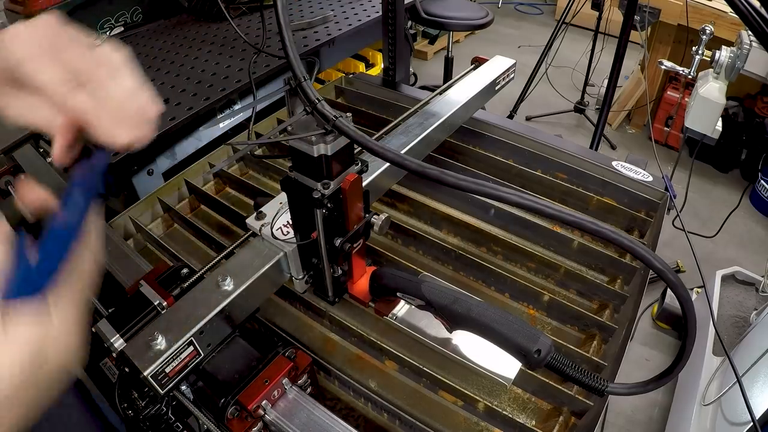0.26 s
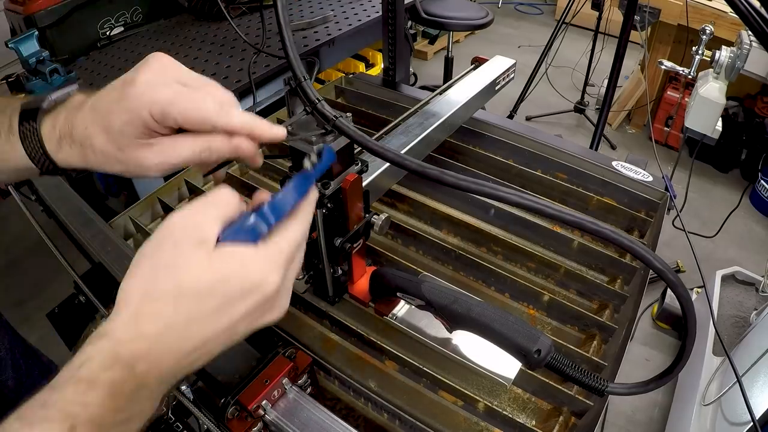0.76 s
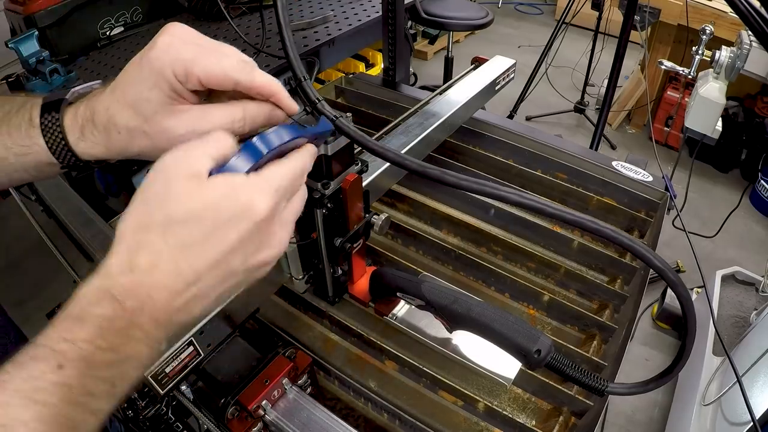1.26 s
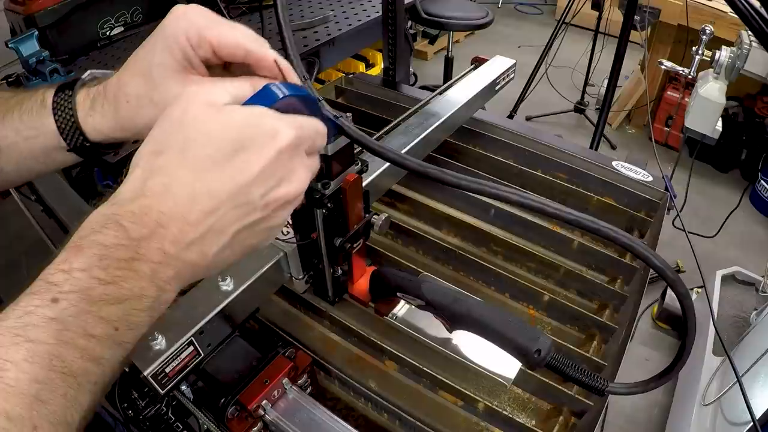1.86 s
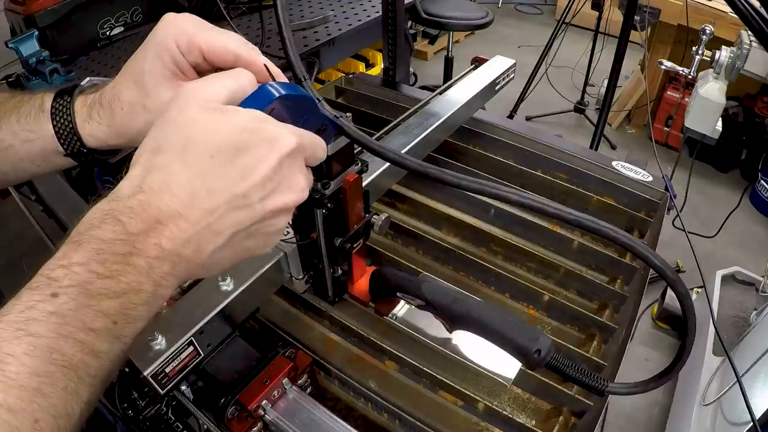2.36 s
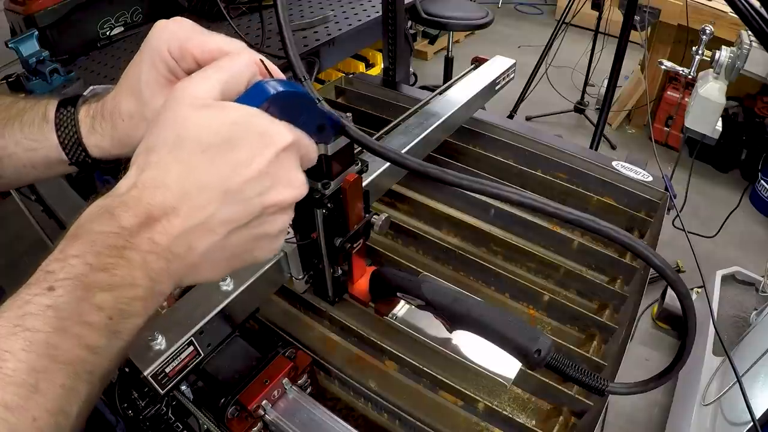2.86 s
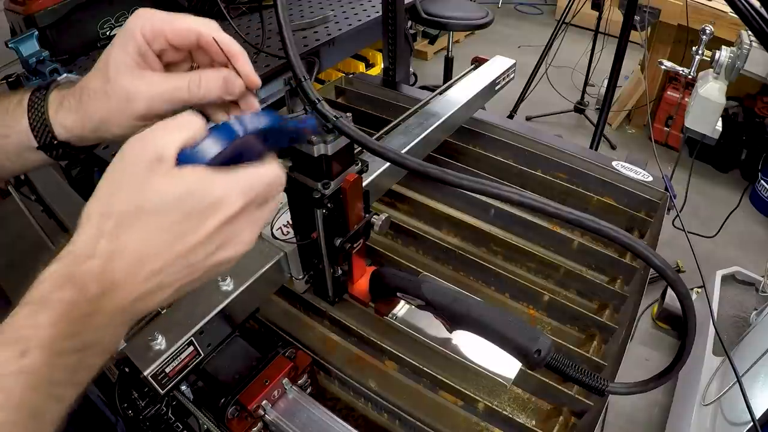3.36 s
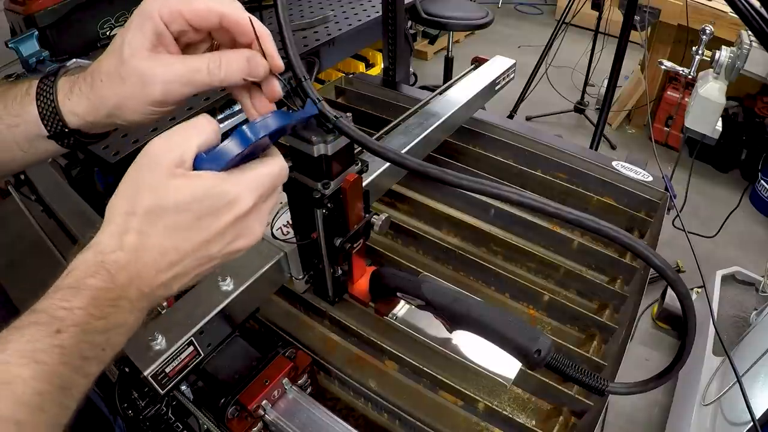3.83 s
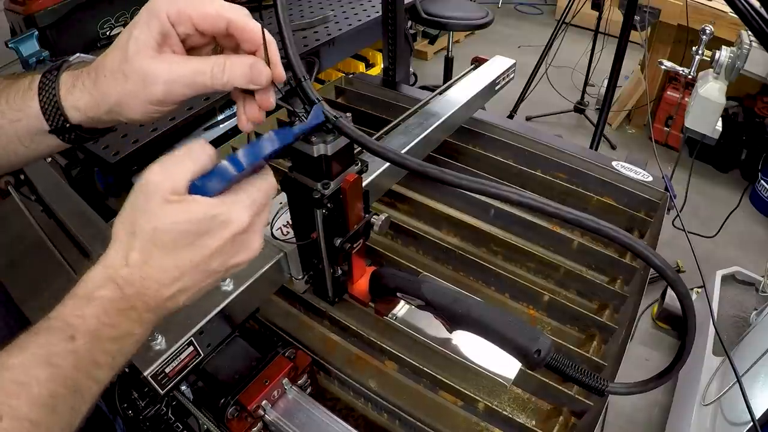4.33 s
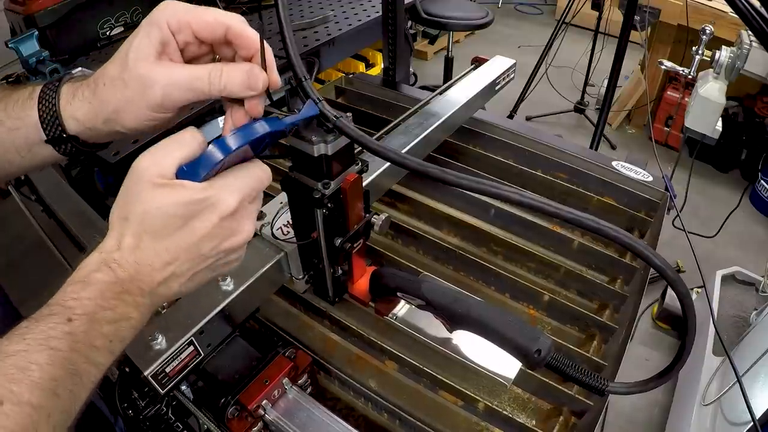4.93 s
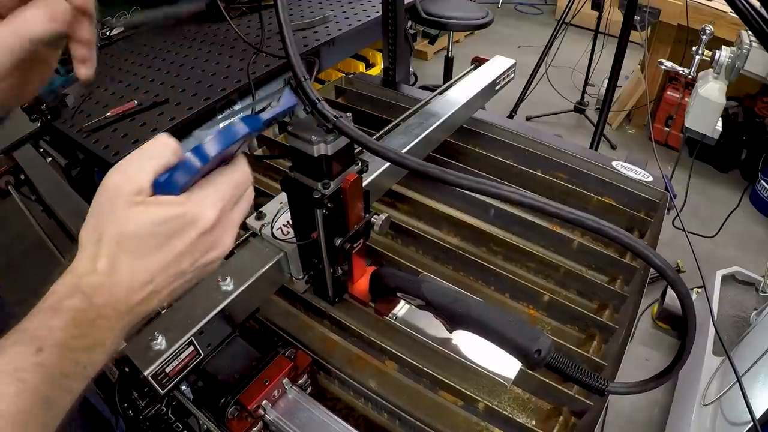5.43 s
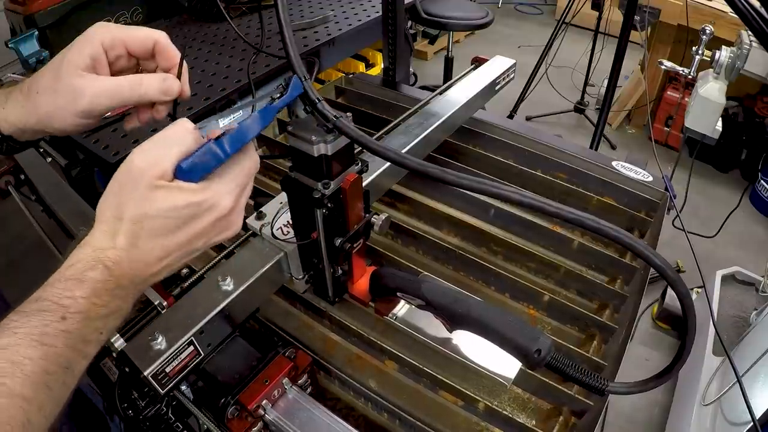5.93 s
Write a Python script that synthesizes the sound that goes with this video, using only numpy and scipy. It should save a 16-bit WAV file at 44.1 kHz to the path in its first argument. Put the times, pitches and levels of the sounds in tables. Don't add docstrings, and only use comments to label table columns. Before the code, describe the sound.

Close up, a hand-held tie gun is handled with faint sleeve rustle and small latch clicks, then ratchets sparsely until a loud, hollow snap cuts the tie. Lighter pops follow, a second burst of quick ratchet clicks, another loud snap and a bright clattering trigger return. Each hard snap echoes in a large, hard workshop over low building hum.

```python
import sys
import numpy as np
from scipy import signal
from scipy.io import wavfile
from scipy.ndimage import uniform_filter1d

SR = 44100
rng = np.random.default_rng(int(sys.argv[2]) if len(sys.argv) > 2 else 0)


def convert_level_to_amplitude(level_db):
    exponent = np.asarray(level_db, float) / 20
    return 10 ** exponent


def master(y):
    cut = np.clip(np.atleast_2d(y).T, -1, 1)
    pcm = np.round(cut * 32767)
    wavfile.write(sys.argv[1], SR, pcm.astype(np.int16))


N = 272979

# (frequency [Hz], density [dB per Hz])
HUM_COLOUR = [(15, -62), (25, -37.5), (53, -28.5), (123, -0.5), (170, -8), (591, -14.5), (714, -18.5),
              (1290, -20.5), (2410, -29), (3250, -28), (3820, -30.5), (6740, -35), (16000, -36.5)]
# (peak time [s], level [dB], rise [s], fall [s])
RUMBLE_SWELLS = [
    (1.15, -49, 0.38, 0.12),
    (1.4, -44.5, 0.17, 0.37),
    (2.0, -53, 0.16, 0.33),
    (2.9, -32.5, 0.046, 0.19),
    (4.0, -53, 0.61, 0.75),
    (4.6, -62, 0.38, .3),
    (5.15, -35.5, 0.035, 0.17),
    (5.7, -54.5, 0.26, 0.29),
]
# (frequency [Hz], density [dB per Hz])
RUMBLE_COLOUR = [(40, -37), (75, -14.5), (130, 5.5), (250, -6.5), (420, -3), (650, -11.5), (1500, -36.5)]
# (peak time [s], level [dB], rise [s], fall [s])
RUSTLE_STROKES = [
    (.03, -47.5, 0.13, 0.073),
    (.2, -49.5, 0.032, 0.093),
    (.56, -52.5, 0.096, 0.29),
    (1.0, -66, 0.4, 0.29),
    (1.4, -66, 0.27, 0.14),
    (1.7, -59, 0.21, 0.18),
]
# (frequency [Hz], density [dB per Hz])
CLOTH_COLOUR = [(290, -19), (500, -4.5), (1460, -12), (1820, -8), (2500, -13.5), (5710, -11.5),
                (14000, -17.5), (16000, -23)]
# (start [s], end [s], pitch [Hz], bandwidth [Hz], level [dB])
SQUEAKS = [
    (0.545, 0.585, 2980, 121, -56),
    (0.704, 0.855, 3000, 90, -70),
    (0.814, 0.957, 1723, 45, -59.5),
    (1.087, 1.207, 1710, 121, -60.5),
    (3.603, 3.88, 1280, 304, -59.5),
]

# (frequency [Hz], t60 [s])
HALL_T60 = [(100, 0.28), (300, 1), (900, 0.87), (2200, 0.69), (5000, 0.78), (8300, 0.8), (12000, 0.36),
            (16000, 0.3)]
# (frequency [Hz], level [dB])
HALL_TONE = [(100, -6.5), (500, -17.5), (900, -7.5), (1250, -9), (2500, -4.5), (5000, -1), (7200, -1),
             (10000, 0), (16000, 0.5)]
# (delay [s], level [dB])
ECHOES = [
    (.0075, -11),
    (0.01, -23.5),
    (0.0247, -13),
    (.033, -17),
]
# (frequency [Hz], level [dB])
POP_AIR = [(1500, -7.5), (6000, -3.5), (9000, -5), (12000, 2), (15500, 8.5)]
# (frequency [Hz], level [dB])
HAND_SHADE = [(550, -1.5), (820, -4.5), (1050, 4.5), (6900, -2), (7700, -9), (8400, -10.5), (9600, -7),
              (11200, 3)]

MACHINE_HZ = {"bed": 145, "plate": 280, "frame": 375, "rail": 490, "post": 602, "cover": 560, "lid": 770}
GUN_HZ = {"grip": 1280, "barrel": 1870, "shell": 2170, "cheek": 2290, "lever": 3400, "nose": 2650, "spring":
          6680, "jaw": 2120, "knuckle": 2960, "sear": 7250, "blade": 10250, "pin": 12800, "pawl": 14050,
          "tooth": 15200}
RING_T60 = {"lid": 0.019, "bed": 0.94, "plate": 0.027, "frame": 0.2, "rail": 0.12, "post": 2, "cover":
            0.015, "grip": 0.012, "barrel": 0.033, "shell": 0.082, "cheek": 0.025, "lever": 0.046, "nose":
            .025, "spring": 0.039, "blade": 0.058, "pin": 0.028, "pawl": 0.054, "tooth": 0.033, "sear": .03,
            "knuckle": .05, "jaw": 0.021}
RING_HALL_DB = {"lid": -14, "bed": -10, "plate": -9, "frame": -11, "rail": -13, "post": -8, "cover": -15,
                "grip": -9, "barrel": -9, "shell": -13.5, "cheek": -8, "lever": -14, "nose": -9, "spring":
                -26, "blade": -13, "pin": -26, "pawl": -23, "tooth": -26, "sear": -15.5, "knuckle": -20,
                "jaw": -9}
# (time [s], part struck, level [dB])
MACHINE_RINGS = [(1.062, "frame", -47), (1.355, "frame", -36), (1.356, "cover", -35), (1.493, "rail", -39),
                 (1.5, "bed", -53), (1.548, "rail", -46), (1.598, "frame", -47), (2.8342, "cover", -7),
                 (2.836, "lid", -17), (2.837, "bed", -36), (2.842, "frame", -25), (3.0697, "lid", -16),
                 (4.044, "frame", -37.5), (4.592, "cover", -40), (5.072, "rail", -28), (5.072, "lid", -11),
                 (5.073, "plate", -28), (5.074, "cover", -14), (5.075, "bed", -36), (5.285, "post", -51)]
# (time [s], part struck, level [dB])
GUN_RINGS = [(.692, "knuckle", -38), (1.355, "barrel", -35), (1.363, "lever", -42.5),
             (1.493, "barrel", -37), (1.8254, "spring", -32), (1.84, "lever", -38), (1.843, "jaw", -28),
             (1.9785, "grip", -29), (2.2876, "sear", -44), (2.3915, "barrel", -38), (2.837, "nose", -13),
             (2.8377, "barrel", -7), (2.841, "grip", -13), (3.036, "lever", -25), (3.068, "jaw", -16),
             (3.069, "blade", -30), (3.084, "pawl", -30), (3.608, "spring", -63), (3.798, "spring", -59),
             (4.047, "blade", -40), (4.066, "spring", -39.5), (4.079, "tooth", -30), (4.097, "tooth", -26),
             (4.097, "pin", -22), (4.167, "pawl", -43), (4.253, "lever", -30), (4.253, "grip", -31),
             (4.254, "barrel", -23), (4.281, "pawl", -34), (4.293, "pawl", -32), (4.301, "pawl", -25),
             (4.325, "shell", -19), (4.326, "sear", -29), (4.326, "blade", -31), (4.335, "cheek", -25),
             (4.744, "spring", -36), (5.073, "barrel", -12), (5.073, "grip", -13), (5.251, "pin", -21),
             (5.262, "blade", -19.5), (5.263, "pin", -22), (5.264, "blade", -21), (5.265, "tooth", -10.5),
             (5.268, "pawl", -24), (5.2836, "shell", -13), (5.289, "cheek", -12), (5.296, "blade", -29),
             (5.3, "pawl", -32), (5.319, "cheek", -25), (5.348, "shell", -29), (5.745, "spring", -58.5),
             (5.866, "grip", -45), (5.866, "pawl", -48), (5.867, "spring", -41), (6.058, "spring", -45),
             (6.073, "spring", -27), (6.085, "barrel", -26.5), (6.123, "tooth", -29), (6.123, "grip", -40)]
# (time [s], peak level [dB], pitch [Hz], length [ms])
KNOCKS = [(1.056, -47, 250, 5), (1.355, -33, 303, 1.6), (1.976, -45, 200, 3.7), (2.392, -44, 200, 8.8),
          (2.834, -9, 172, 6.9), (2.841, -14, 100, 6.5), (3.0697, -10, 210, 1.13), (4.042, -30.5, 300, 3.2),
          (4.098, -64, 200, 5.5), (4.325, -28, 250, 5.9), (4.805, -22, 200, 1.9), (4.828, -31, 220, 4.8),
          (5.073, -18.5, 130.4, 11), (5.076, -10.5, 80, 11), (5.264, -15, 142, 9.5), (5.288, -21, 251, 2.4),
          (6.1231, -17, 200, 2.1)]

# (frequency [Hz], level [dB])
BODY_COLOUR = [(400, -38.5), (800, -18.5), (1100, -1.5), (1500, -10.5), (2000, -0.5), (2800, 2),
               (3200, -0.5), (5000, -56.5)]
# (frequency [Hz], level [dB])
CRACK_COLOUR = [(1800, -15.5), (2700, -10), (3400, -1.5), (5000, -5), (6700, -8), (8200, -9), (9300, -7.5),
                (12000, -31.5)]
# (frequency [Hz], level [dB])
BRIGHT_COLOUR = [(6000, -34), (8500, -11), (10000, 2), (12500, 4), (14500, 4), (15700, -0.5)]
# (frequency [Hz], bandwidth [Hz], level [dB])
GUN_MODES = [
    (3960, 650, -23),
    (6800, 1000, -3.5),
    (10850, 110, -24.5),
    (13300, 290, -13),
    (14400, 270, -16.5),
]
# (time [s], strength [dB], brightness [dB], body pitch [Hz])
FUMBLES = [(.087, -49.5, -8, 3180), (0.84, -58, -12, 1120), (0.855, -48.5, -3, 2820),
           (0.9765, -55.5, -18, 3700), (1.01, -58, -12, 1740), (1.178, -50, -7, 1770),
           (1.223, -58.5, -23, 2030), (1.548, -55, -21, 1850), (1.578, -50, -14, 1870),
           (1.5982, -46, -21, 1890), (1.805, -50, -6, 1870), (2.4642, -46.5, -8, 2140),
           (2.5969, -53, -2, 2150), (3.497, -48.5, -8, 2340), (3.546, -55, -7, 1920),
           (3.609, -54.5, -19, 1120), (3.618, -53, -5, 1570), (3.6902, -48, -9, 3260),
           (3.729, -54, -11, 1230), (3.798, -54.5, -17, 1210), (3.848, -59, -21, 1335),
           (3.9456, -55.5, -10, 1164), (3.999, -54.5, -19, 1900), (4.508, -54.5, -27, 1960),
           (4.592, -52, -9, 2600), (4.729, -52, 5, 1713), (5.045, -47, -6, 2220), (5.662, -61, 6, 1720),
           (5.743, -56.5, -10.5, 1270), (5.764, -55, -10, 2740)]
# (time [s], strength [dB], brightness [dB], body pitch [Hz])
TICKS = [(1.527, -58, -23, 1980), (2.284, -53, -20, 2030), (2.456, -60, -17, 1960), (2.627, -66, -12, 2500),
         (2.72, -55, -6, 2010), (2.797, -57, 0, 2500), (2.9149, -31, -18, 2850), (3.293, -66, 20, 2500),
         (3.736, -59, -7, 2600), (3.829, -58, -6, 2400), (4.487, -51.5, -14, 1900), (4.716, -57, -12, 2050),
         (5.61, -63, 12.5, 2200), (5.734, -59, -4.5, 3490)]
# (time [s], strength [dB], brightness [dB], rattle length [ms])
LATCH = [
    (.2663, -28, 0.5, 3),
    (.272, -36.5, -2, 1.1),
    (.543, -45, 0, 2.3),
    (.558, -42, -5, 1.2),
    (.6916, -37.5, 7, 3.8),
    (.698, -37.5, -3, 8),
]
# (time [s], strength [dB], brightness [dB], rattle length [ms])
FEEDING = [(.6705, -43, 6, 1.2), (1.0558, -35.5, -5, 9), (1.062, -44.5, -11, 1.9), (1.0649, -41.5, -2, 3.4),
           (1.3533, -28.5, -4.5, 8.4), (1.3633, -34, 1, 6.4), (1.4898, -36.5, -11, 9.3),
           (1.497, -47, -13, 2.9), (1.8253, -34, 9, 7.4), (1.8411, -31.5, 4, 2.4),
           (2.2876, -38.5, -1.5, 3.7), (2.3253, -47.5, -2.5, 2.7), (2.7289, -41.5, -11.5, 8.1),
           (2.7817, -44, -7.5, 4.6), (3.0165, -28, -5.5, 8.6), (3.0238, -19, -9, 2.5),
           (3.0275, -22, 15.5, 11), (3.0667, -16.5, 6, 5.4), (3.0702, -19, 6, 3)]
# (time [s], strength [dB], brightness [dB], rattle length [ms])
PUMPING = [(4.0325, -35, -2, 3.8), (4.042, -25, 3.5, 3.5), (4.046, -32, 5, 1.8), (4.053, -38, -7, 9.6),
           (4.065, -35, -3, 4.7), (4.0795, -28.5, 15.5, 5.3), (4.0851, -25, -4, 15), (4.1665, -33, 0, 9.3),
           (4.253, -29, -2, 0.99), (4.255, -25.5, 3, 4.1), (4.28, -23, 9, 6.2), (4.2918, -30.5, -1, 8.7),
           (4.303, -27, 4, 11), (4.3245, -18.5, 6.5, 4.2), (4.3346, -23, 12, 5), (4.5546, -46.5, 21.5, 2.1),
           (4.7358, -41.5, 0, 8.2), (4.747, -45.5, -4, 5.6), (4.764, -31, -1, 6.7), (4.7787, -27, -11, 3.8)]
# (time [s], strength [dB], brightness [dB], rattle length [ms])
NEXT_TIE = [
    (5.8634, -45, 7, 3.8),
    (5.869, -42.5, -1, 4.2),
    (6.058, -43, 11, 2.2),
    (6.0661, -32, 7, 4.7),
    (6.0719, -27, 8, 13),
    (6.085, -22, 2, 3),
    (6.09, -31, 3, 2.5),
]
# (time [s], strength [dB], brightness [dB], rattle length [ms])
LINKAGE = [(1.815, -49, 14, 3.2), (2.7335, -40.5, -10, 5.6), (2.7421, -48.5, 0, 5.1),
           (2.7465, -43.5, -14, 4.9), (2.8248, -26, -1, 7.7), (3.0305, -26.5, -22, 1.2),
           (3.0355, -23, -13, 4.4), (4.0735, -32, -3, 4.9), (4.0959, -22, 4, 8.9),
           (4.1595, -38.5, -11, 3.4), (4.603, -53, -13, 4), (4.7554, -37.5, 0, 4.1), (4.7608, -27, 13, 4),
           (5.5549, -43.5, 6, 2.8)]
# (time [s], strength [dB], brightness [dB], rattle length
# [ms])
LATE_POPS = [
    (3.4419, -29, 7.5, 3.6),
    (3.4685, -34, 9, 5.6),
]
# (time [s], strength [dB], brightness [dB], rattle length [ms])
POPS = [(1.9785, -29, 2.6, 4.7), (1.985, -47, 29, 6), (2.3912, -30, 8.3, 4.1), (2.398, -45, 16, 9.6),
        (3.0695, -23.5, 11, 3), (4.804, -31.5, 24, 3.5), (4.8105, -39.5, 32, 6), (4.8287, -31.5, 12, 3.7),
        (4.835, -43, 29, 7.6), (6.123, -25, 10, 3), (6.129, -47, 34, 6.6)]
# (time [s], strength [dB], brightness [dB], rattle length [ms])
RELEASE = [
    (5.2335, -31.5, -8.5, 2.5),
    (5.2483, -20.5, -2, 2.1),
    (5.2508, -15.5, 7, 5.8),
    (5.2628, -18.5, 1, 3),
    (5.2655, -18.5, 14.5, 5.2),
    (5.2833, -18.5, -3.5, 4.1),
    (5.288, -14.5, 6, 4.9),
    (5.2955, -40, 6, 2.8),
]
# (time [s], strength [dB], brightness [dB], rattle length [ms], body pitch [Hz])
SNAPS = [
    (2.8346, -6.5, -1, 11.3, 1880),
    (2.8375, -12, -12.5, 3.9, 2700),
    (2.8445, -13.5, 3.5, 5.8, 2260),
    (5.0715, -7.5, -0.5, 12, 1967),
    (5.0745, -9, 1, 2.9, 1420),
    (5.0815, -19.5, 14, 5.8, 1820),
    (5.0965, -20.5, 1, 3.5, 2900),
]


def evened(x):
    return x / np.sqrt(np.mean(x ** 2) + 1e-20)


def read(points, hz):
    f, value = np.transpose(points)
    return np.interp(np.log(hz + 1), np.log(f + 1), value)


def add(mix, s, sound):
    part = mix[round(s * SR):][:len(sound)]
    part += sound[:len(part)]


def causal(points):
    log_gain = np.log(convert_level_to_amplitude(read(points, abs(np.fft.fftfreq(1024, 1 / SR)))))
    spectrum = np.exp(np.conj(signal.hilbert(log_gain)))
    h = np.fft.ifft(spectrum).real[:512]
    return h / np.linalg.norm(h)


def ring(t, hz, width_hz):
    h = np.exp(-np.pi * width_hz * t) * np.sin(2 * np.pi * hz * t)
    return h / np.linalg.norm(h)


def noise(points, level_db, patchy_db, size=512):
    frames = 4 * N // size + 5
    hz = np.fft.rfftfreq(size, 1 / SR)
    real, imag, patches = rng.standard_normal((frames, len(hz), 3)).T
    patches = uniform_filter1d(patches, size=16, axis=0)
    patches = evened(uniform_filter1d(patches, size=9, axis=1))
    z = (real + 1j * imag) * convert_level_to_amplitude(read(points, hz)[:, None] + patchy_db * patches)
    sound = signal.istft(z, nperseg=size, noverlap=3 * size // 4)[1][:N]
    return convert_level_to_amplitude(level_db) * evened(sound)


def swells(rows, still_db):
    t = np.arange(N) / SR
    power = convert_level_to_amplitude(2 * still_db)
    for s, db, rise, fall in rows:
        power = power + convert_level_to_amplitude(2 * db) / np.cosh((t - s) / np.where(t < s, rise, fall) * 2) ** 2
    return 10 * np.log10(power)


def building_hum():
    t = np.arange(N) / SR
    mains = convert_level_to_amplitude(-62) * np.sin(2 * np.pi * 110 * t) + convert_level_to_amplitude(-63) * np.sin(2 * np.pi * 239 * t)
    return noise(HUM_COLOUR, -56, patchy_db=0.6, size=1024) + mains


def machine_rumble():
    level_db = swells(RUMBLE_SWELLS, still_db=-63.5) - 4.5
    return noise(RUMBLE_COLOUR, level_db, patchy_db=1.5, size=2048)


def sleeve_rustle():
    return noise(CLOTH_COLOUR, swells(RUSTLE_STROKES, still_db=-90), patchy_db=0.5)


def far_squeaks():
    out = np.zeros(N)
    for t0, t1, hz, width_hz, db in SQUEAKS:
        t = np.arange(0, t1 - t0, 1 / SR)
        resonance = ring(np.arange(2000) / SR, hz, width_hz)
        tone = signal.fftconvolve(rng.standard_normal(SR // 2), resonance)[2000:][:len(t)]
        flutter = convert_level_to_amplitude(0.57 * np.sin(60 * t + hz))
        add(out, t0, convert_level_to_amplitude(db) * tone * signal.windows.hann(len(t)) ** 0.12 * flutter)
    return out


def hall():
    t, taps = np.arange(SR) / SR, rng.standard_normal((3, SR))
    hz, frame_t, z = signal.stft(taps, SR, nperseg=256)
    loss_db = 60 * frame_t / read(HALL_T60, hz)[:, None]
    bend_db = 20.5 * frame_t ** 2
    z = z * convert_level_to_amplitude(read(HALL_TONE, hz)[:, None] - loss_db - bend_db)
    tails = signal.istft(z, SR, nperseg=256)[1][:, :SR]
    near = 0.45 * np.clip((t - 0.004) / 0.015, 0, 1)
    late = np.clip((t - 0.022) / 0.0033, 0, 1)
    tails *= near + late * (0.54 + 0.27 * np.exp(-abs(t - 0.024) / 0.008))
    early = np.zeros(SR)
    for s, db in ECHOES:
        early += convert_level_to_amplitude(db) * (t > s) * np.exp(-np.maximum(t - s, 0) / 0.00086) * taps[0]
    tails *= convert_level_to_amplitude(22 * uniform_filter1d(taps[:, ::-1], size=60) * np.exp(-t / 0.056))
    return tails / np.linalg.norm(tails[0]), early / 8


def ringing_parts():
    phase_depth_rad, size_depth = 0.37, 0.53
    out, far, t = np.zeros(N), np.zeros(N), np.arange(SR) / SR
    pitch, rows = {**MACHINE_HZ, **GUN_HZ}, MACHINE_RINGS + GUN_RINGS
    for (s, part, db), z in zip(rows, rng.standard_normal((len(rows), SR))):
        waver = evened(uniform_filter1d(z, size=120))
        swing = np.sin(2 * np.pi * pitch[part] * t + phase_depth_rad * waver)
        swing *= np.minimum(1000 * t, 1)
        sound = convert_level_to_amplitude(db - 60 * t / RING_T60[part]) * (1 + size_depth * waver[::-1]) * swing
        add(out, s, sound)
        add(far, s, convert_level_to_amplitude(RING_HALL_DB[part]) * sound)
    return out, far


def trigger_knocks():
    out, t = np.zeros(N), np.arange(4000) / SR
    for s, db, hz, ms in KNOCKS:
        turns = hz * t * (0.5 + 5.34 * np.exp(-t / 0.0016))
        add(out, s, -convert_level_to_amplitude(db) * np.sin(2 * np.pi * turns) * np.exp(-1000 * t / max(ms, 1)))
    return signal.lfilter(*signal.butter(2, 70, "high", fs=SR), out)


def blows(rows, hz):
    return [(*row, hz * (1 + 0.006 * z)) for row, z in zip(rows, rng.standard_normal(len(rows)))]


def clicks(rows, hollow_db, modes_db):
    out, far, t = np.zeros(N), np.zeros((3, N)), np.arange(1000) / SR
    colours = np.array([causal(BODY_COLOUR), causal(CRACK_COLOUR), causal(BRIGHT_COLOUR)])
    modes = np.array([convert_level_to_amplitude(db + modes_db) * ring(t[:512], hz, width_hz) for hz, width_hz, db in GUN_MODES])
    high = np.transpose(GUN_MODES)[0] > 9000
    draws = rng.standard_normal((len(rows), 4, len(t)))
    for k, (s, db, bright_db, ms, hz) in enumerate(rows):
        u = t / (max(ms, 0.5) / 1000)
        grain = convert_level_to_amplitude(13 * uniform_filter1d(draws[k, 3], size=24))
        shape = np.minimum(u / 0.044, 1) * np.exp(-1.1 * u ** 2) * grain
        paths = colours.copy()
        paths[0] += convert_level_to_amplitude(hollow_db) * ring(t[:512], hz, 300)
        struck = convert_level_to_amplitude(5.9 * draws[k, 3, :len(GUN_MODES), None]) * modes
        paths[1] += struck[~high].sum(0)
        paths[2] += struck[high].sum(0)
        layers = signal.fftconvolve(draws[k, :3] * shape, paths, axes=1)
        balance_db = np.array([-bright_db / 2, 1.08, bright_db / 2])
        gains = convert_level_to_amplitude(db + balance_db) * np.sqrt(SR / 1000)
        add(out, s - 0.0003, gains / np.linalg.norm(layers, axis=1) @ layers)
        add(far[k % 3], s, gains @ (colours + 0.42 * (paths - colours)))
    return out, far


def small_clicks():
    taps = [(s, db, bright_db, 4.6, hz) for s, db, bright_db, hz in FUMBLES + TICKS]
    taps += blows(FEEDING + PUMPING + NEXT_TIE, 2040)
    taps += blows(LINKAGE, 3600) + blows(LATCH, 2980)
    return clicks(sorted(taps), hollow_db=8, modes_db=-4)


def scene():
    background = building_hum() + machine_rumble() + sleeve_rustle() + far_squeaks()
    tails, early = hall()
    ringing, ringing_far = ringing_parts()
    low = trigger_knocks()
    small, small_far = small_clicks()
    late_pops, late_pops_far = clicks(blows(LATE_POPS, 1900), hollow_db=12, modes_db=-10)
    pops, pops_far = clicks(blows(POPS, 1900), hollow_db=9.5, modes_db=-8.5)
    back, back_far = clicks(blows(RELEASE, 2040), hollow_db=0, modes_db=-10)
    snaps, snaps_far = clicks(SNAPS, hollow_db=9, modes_db=-8)

    shade = causal(HAND_SHADE)
    back = signal.fftconvolve(back, shade)[:N]
    hard_far = convert_level_to_amplitude(-2) * snaps_far + convert_level_to_amplitude(-9) * back_far
    hard_far = signal.fftconvolve(hard_far, shade[None], axes=1)[:, :N]
    pops_far = signal.fftconvolve(pops_far, causal(POP_AIR)[None], axes=1)[:, :N]
    small += back + pops + late_pops
    small_far += convert_level_to_amplitude(1.5) * late_pops_far

    to_hall = convert_level_to_amplitude(-14.5) * small_far + convert_level_to_amplitude(-6.5) * pops_far + hard_far
    to_hall = to_hall + convert_level_to_amplitude(-14.5) * low + ringing_far
    wet = signal.fftconvolve(to_hall, tails, axes=1).sum(0)[:N]
    wet += signal.fftconvolve(small + convert_level_to_amplitude(8) * snaps, early)[:N]
    return (background + wet + ringing + low + small + snaps)[None]


def band_limit(x):
    return signal.sosfilt(signal.butter(12, 16810, fs=SR, output="sos"), x)


def record(dry):
    x = 0.9 * np.tanh(dry / 0.9)
    x = signal.sosfilt(signal.butter(2, 42, "high", fs=SR, output="sos"), x)
    steep = signal.firwin(511, 15850, window=("kaiser", 8), fs=SR)
    cut = signal.oaconvolve(x, steep[None], "same")
    leak = convert_level_to_amplitude(-34) * signal.oaconvolve(x - cut, signal.firwin(255, 16700, fs=SR)[None], "same")
    return band_limit(cut + leak - 0.0006)


dry = scene()
out = record(dry)
master(out)
```